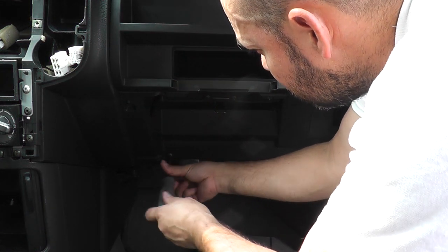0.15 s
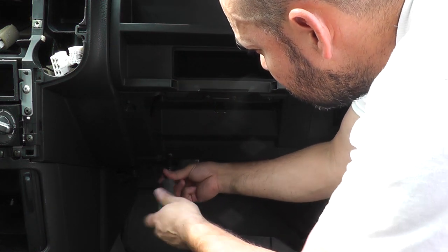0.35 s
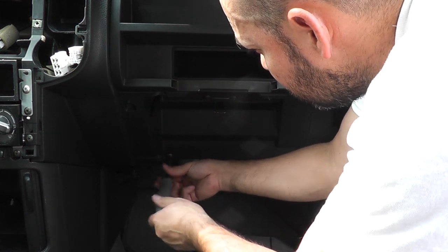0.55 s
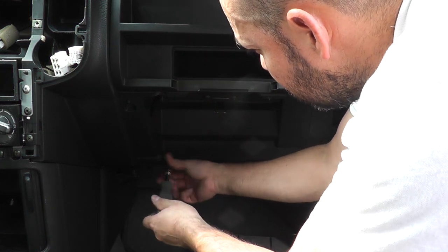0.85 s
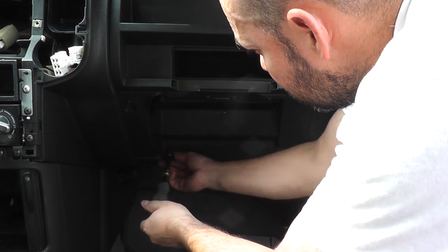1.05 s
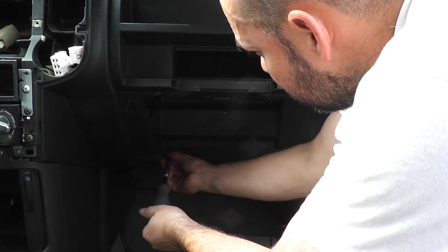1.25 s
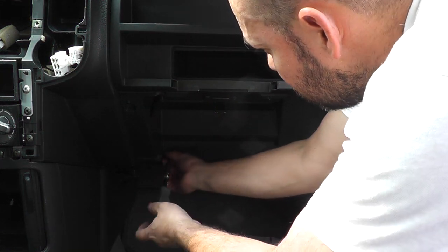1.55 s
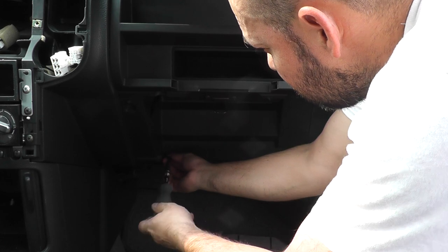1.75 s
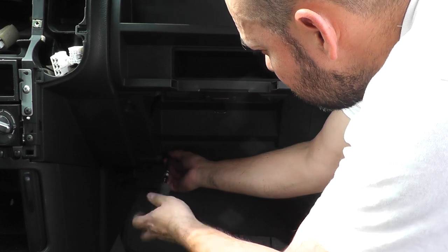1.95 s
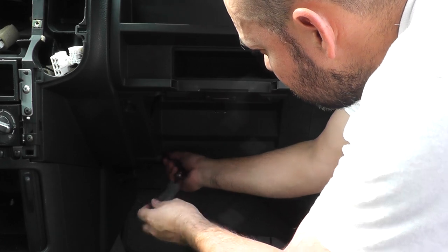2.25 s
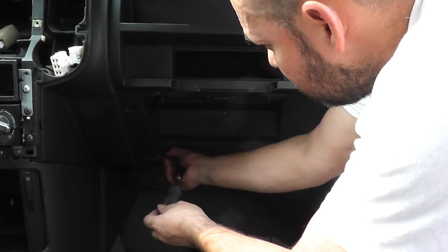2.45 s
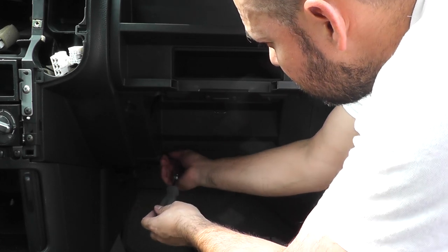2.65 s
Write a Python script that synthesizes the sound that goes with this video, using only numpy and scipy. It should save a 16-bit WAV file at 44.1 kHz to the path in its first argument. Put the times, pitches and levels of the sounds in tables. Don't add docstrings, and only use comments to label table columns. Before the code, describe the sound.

Close up inside a quiet car, a screwdriver tip slips and scrapes in a screw head, knocking hollow plastic; a loud snap comes first, then scattered clicks, a lull, and high chirps as the screw loosens, over faint low hum.

```python
import sys
import numpy as np
from scipy import signal
from scipy.fft import rfft, irfft, next_fast_len
from scipy.io import wavfile
from scipy.ndimage import uniform_filter1d

SR = 44100
rng = np.random.default_rng(int(sys.argv[2]) if len(sys.argv) > 2 else 0)


def dump_mix(stems):
    frames = np.atleast_2d(stems).T
    limited = np.clip(frames, -1, 1)
    pcm = np.round(limited * 32767).astype(np.int16)
    wavfile.write(sys.argv[1], SR, pcm)


def volts(x):
    e = np.asarray(x, float) / 20
    return 10 ** e


N = 123479

# f/Hz, level/dB, t60/s
PANEL_MODES = [(552.2, -1.5, 0.042), (771, -1, 0.029), (1084, -18.5, 0.036), (1320, -15, 0.021),
               (1668, -14.5, 0.023)]
# f/Hz, level/dB, t60/s
HOLLOW_MODES = [(125, -0.5, 0.053), (180.3, -1, 0.1), (219.3, -4.5, 0.082), (280.8, -8, 0.066)]
# f/Hz, level/dB, t60/s
HEAD_MODES = [(2660, 6, 0.014), (3750, 6, 0.029), (5294, 11.5, 0.01), (6360, 3, 0.04), (8770, 11.5, 0.0083),
              (13700, -27, 0.0065)]
# modes, relative spread of close modes around each, crack level/dB
PLASTIC = (PANEL_MODES, 0.07, -42)
HOLLOW = (HOLLOW_MODES, 0.087, -45)
HEAD = (HEAD_MODES, 0.1215, -9)
# f/Hz, level/dB, t60/s
TRIM = ([(1405, 11, 0.023), (1796, 3.5, 0.032), (2580, -5, 0.019)], 0.055, -47)
# f/Hz, coherence
COHERENCE = [(60, 0.96), (250, 0.0), (2200, 0.76), (4600, .995), (6500, 0.94), (9000, 0.65), (15000, 0.45)]


def evened(x):
    return x / np.sqrt(np.mean(x ** 2) + 1e-20)


def read(points, hz):
    f, value = np.transpose(points)
    return np.interp(np.log(hz + 1), np.log(f + 1), value)


def band(x, low_hz, top_hz, order):
    edges_hz = [low_hz, top_hz]
    return signal.sosfilt(signal.butter(order, edges_hz, "band", fs=SR, output="sos"), x)


def ring(modes, crowd, crack_db):
    count, colour_spread_db = 10, 2.5
    hz, db, t60 = np.transpose(np.repeat(modes, count, axis=0))[:, :, None]
    t = np.arange(3000) / SR
    colour, shift = rng.standard_normal((2, len(hz), 1))
    place = np.tile(np.linspace(-1.6, 1.6, count), len(modes))[:, None] + shift / count
    decay = volts(db + colour_spread_db * colour - 60 * t / t60)
    wave = np.sin(2 * np.pi * hz * (1 + crowd * place) * t)
    tap = (decay * np.sign(shift) * wave).sum(0)
    crack = volts(crack_db - 60 * t / .005) * np.diff(rng.standard_normal(3001))
    tap += crack * abs(tap).max()
    return tap / np.linalg.norm(tap)


def strikes(rows, first, second):
    slips_per_s, slip_spread_db, bite_s = 2600, 2, .0012
    out, t = np.zeros(N), np.arange(2000) / SR
    for start_s, peak_db, second_db, length_s in rows:
        slips = (rng.random(len(t)) < slips_per_s / SR) * rng.choice([-1., 1.], len(t))
        slips *= volts(slip_spread_db * np.minimum(rng.exponential(1, len(t)), 2))
        slips *= np.exp(-(t / length_s) ** 2)
        slips[[0, round(bite_s * SR)]] = 1.0
        slips *= np.clip(t / bite_s, .15, 1)
        a = signal.fftconvolve(slips, ring(*first))
        b = signal.fftconvolve(slips, ring(*second))
        sound = volts(peak_db) * (a / abs(a).max() + volts(second_db) * b / abs(b).max())
        part = out[round(start_s * SR):][:len(sound)]
        part += sound[:len(part)]
    return out


def noise(spectrum, patchy_db):
    hz = np.fft.rfftfreq(1024, 1 / SR)
    a, b, c, d, patches = rng.standard_normal((N // 256 + 5, 513, 5)).T
    patches = uniform_filter1d(patches, size=14, axis=0)
    patches = evened(uniform_filter1d(patches, size=8, axis=1))
    like = np.clip(read(COHERENCE, hz), -1, 1)[:, None]
    left = a + 1j * b
    right = like * left + np.sqrt(1 - like ** 2) * (c + 1j * d)
    z = np.array([left, right]) * volts(read(spectrum, hz)[:, None] + patchy_db * patches)
    return evened(signal.istft(z, nperseg=1024, noverlap=768)[1][:, :N])


def air():
    # f/Hz, level/dB per Hz
    hum = [(12, -44), (20, 4.5), (169, -0.5), (392, -7), (859, -10), (1020, -15.5), (2170, -30.5),
           (6300, -32.5), (16400, -36.5)]
    return volts(-53.5) * noise(hum, patchy_db=.8)


def hand():
    # t/s, length/s, creak level/dB, sliding hiss level/dB
    strokes = [(-.01, 0.12, -48, -61.5), (0.122, 0.093, -48.5, -62.5), (0.198, 0.16, -50, -68),
               (0.365, 0.23, -42.5, -65.5), (.47, 0.12, -64, -77), (0.577, 0.13, -47, -70),
               (0.702, 0.25, -45.5, -67), (0.937, 0.22, -64, -86), (1.073, 0.091, -54, -62.5),
               (1.184, 0.16, -51, -71), (1.348, 0.16, -56.5, -75.5), (1.49, 0.26, -63.5, -79.5),
               (1.594, 0.082, -51.5, -67), (1.624, 0.057, -52, -69), (1.735, 0.33, -49, -70.5),
               (2.035, 0.38, -55.5, -74), (2.451, 0.081, -53, -61), (2.54, 0.22, -66, -76.5),
               (2.675, 0.11, -61.5, -69)]
    # f/Hz, level/dB per Hz
    skin = [(590, -47), (1000, -3), (1370, -6.5), (2150, -15), (7980, -16), (16000, -29)]
    grip_s, lift_s = .012, .037
    rubs_per_s, grit_per_s, spread_db = 900, 100, 3.5
    start, length, creak_db, hiss_db = np.transpose(strokes)[:, :, None]
    t = np.arange(N) / SR - start
    lift = np.exp(-np.maximum(t - length + lift_s, 0) / lift_s * 2)
    touch = np.clip(t / grip_s, 0, 1) * lift
    press = (volts(creak_db + 1) * touch).sum(0)
    slide = (volts(hiss_db + 3.5) * touch).sum(0)

    slips = (rng.random(N) < rubs_per_s / SR) * volts(spread_db * np.minimum(rng.exponential(1, N), 3))
    grit = (rng.random(N) < grit_per_s / SR) * volts(spread_db * np.minimum(rng.exponential(1, N), 3))
    creak_drive = evened(slips) * press
    grit_drive = volts(-10) * evened(grit) * slide
    creak = np.zeros(N)
    which = rng.integers(0, 8, N)
    for k in range(8):
        tap = ring(*HOLLOW) + volts(-5.5) * ring(*PLASTIC)
        creak += signal.oaconvolve(creak_drive * (which == k), tap)[:N]
        creak += signal.oaconvolve(grit_drive * (which == k), ring(*HEAD))[:N]
    flicker = evened(uniform_filter1d(rng.standard_normal(N), size=300))
    hiss = noise(skin, patchy_db=-2.0)[0] * slide * volts(3.5 * flicker)
    return creak + hiss


def ticks():
    # t/s, peak level/dB, shaft over head level/dB, scrape length/s
    tight = [(0.0084, -31.5, -15, 0.004), (0.1017, -19, -14.5, 0.0033), (0.137, -41, -10, 0.006),
             (0.1503, -35.5, -5, 0.0089), (0.178, -37.5, -6, 0.0033), (0.383, -44.5, -30, 0.026),
             (0.517, -46, 3.5, 0.008), (0.532, -36.5, -4.5, 0.0058), (0.589, -42, -5, 0.004),
             (0.6481, -34.5, -1.5, 0.011), (0.7255, -37, -13, 0.0028), (0.775, -35, -16, 0.013),
             (0.810, -39, -6, 0.0064), (0.844, -35.5, 1, 0.012), (0.8794, -29, -5, 0.0045),
             (0.926, -46, -15, 0.0017), (1.0805, -38, -42, 0.0043), (1.1995, -40, -15, 0.038),
             (1.219, -32, -11, 0.0026)]
    loosening = [(1.736, -49.5, -8, 0.0055), (1.751, -53, -4, 0.005), (1.769, -50.5, 0, 0.0015),
                 (1.806, -51, -6, 0.0044), (1.845, -44.5, -32, 0.0042), (1.893, -33, -42, 0.0068),
                 (2.1909, -19.5, 0.5, 0.001), (2.2173, -32, -35, 0.0065), (2.265, -30.5, -0.5, 0.0015),
                 (2.2874, -40.5, -10, 0.0028), (2.352, -34.5, -2.5, 0.0038), (2.6005, -41, -10, 0.0026),
                 (2.632, -41.5, -5, 0.0028), (2.772, -41, -7.5, 0.012)]
    # f/Hz, level/dB, t60/s
    shaft = [(8397, 13.5, 0.016), (7960, -15, 0.006), (9090, 1, 0.048)]
    steel = (shaft, 0.0346, -28)
    return strikes(tight, HEAD, steel) + strikes(loosening, HEAD, steel)


def slams():
    # t/s, peak level/dB, snap over dash level/dB, length/s
    blows = [
        (.1015, -15, -24, 0.00027),
        (.1065, -21, -30, 0.00049),
        (2.071, -36, -1, 0.013),
        (2.1915, -40, 3, 0.002),
    ]
    # modes (f/Hz, level/dB, t60/s), relative spread, crack level/dB
    dash = ([(568, -3, 0.077), (706, 3.5, 0.036), (860, -4, .03), (1113, -3, 0.041), (1353, -9, 0.028),
            (1658, -8.5, 0.048), (2680, -6, 0.03), (2970, -24, 0.034), (3370, -19, 0.077),
            (3770, -8, 0.056)], 0.036, -56)
    snap = ([(12000, 3, .012), (13800, -5, .012), (15000, -2, 0.014)], 0.066, -32)
    return strikes(blows, dash, snap)


def clacks():
    # t/s, peak level/dB, head over trim level/dB, length/s
    contacts = [
        (.1018, -30.5, -12, 0.0021),
        (1.2195, -36.5, -13, 0.01),
        (2.193, -29, -3.5, 0.014),
    ]
    return strikes(contacts, TRIM, HEAD)


def knocks():
    # t/s, peak level/dB, hollow over panel level/dB, push length/s
    blows = [(0.103, -27.5, -4, 0.0035), (0.139, -28.5, -4, 0.0096), (0.152, -33, 4, 0.014),
             (0.179, -31.5, 1, 0.0028), (0.382, -34.5, -15, 0.012), (0.65, -30.5, -4, 0.0061),
             (0.728, -28.5, -5.5, 0.0055), (0.772, -32.5, 2.5, 0.028), (0.811, -33.5, -1, 0.018),
             (0.843, -29.5, -5, 0.019), (0.878, -26, -9, 0.0055), (1.081, -34.5, 3, 0.0026),
             (1.23, -35, -2.5, 0.0069), (1.271, -39.5, 7.5, 0.0097), (1.292, -46, 5.5, .01),
             (1.437, -44, -1.5, 0.0033), (1.611, -36, -17, 0.002), (1.635, -36, -10, 0.014),
             (1.893, -28, -0.5, 0.0086), (2.068, -25.5, -9.5, 0.0086), (2.078, -31, -5.5, 0.0064),
             (2.195, -33.5, 4, 0.004), (2.309, -30, -2, 0.0059), (2.32, -34.5, 2, 0.0053),
             (2.462, -33.5, -8.5, 0.0027), (2.476, -37.5, -17, 0.015), (2.697, -46.5, 0.5, 0.0074)]
    return strikes(blows, PLASTIC, HOLLOW)


def picks():
    # t/s, peak level/dB, trim over head level/dB, length/s
    contacts = [(.3118, -47.5, -4, .003), (.4006, -47.5, 4.5, 0.0046), (.6131, -44.5, -5, 0.001),
                (.826, -35.5, -6, 0.0031), (1.240, -46, -7, 0.0034), (1.2926, -49, -2, 0.0021),
                (1.3619, -49.5, -1.5, 0.0018), (1.380, -54, -19, 0.0015), (1.3888, -49, -11, 0.0018),
                (1.4357, -54.5, 3, 0.0019), (1.635, -48.5, 4, 0.0028), (1.812, -51, 0, 0.004),
                (2.066, -28.5, -2.5, 0.0087), (2.093, -37, -13, 0.0043), (2.106, -46, -28, 0.0027),
                (2.123, -33.5, -23, .005), (2.3088, -43.5, 4.5, 0.0032), (2.4615, -34, -24, 0.0023),
                (2.490, -41, -23, .004), (2.5615, -50, 0, 0.0025), (2.621, -57, 7, 0.0023),
                (2.6929, -49.5, -6, 0.0073), (2.797, -38, -13, 0.004)]
    return strikes(contacts, HEAD, TRIM)


def chirps():
    # t/s, peak level/dB, screw over head level/dB, scrape length/s
    turns = [(2.0715, -23, 1.5, 0.0054), (2.078, -28.5, 9, 0.003), (2.1015, -35, 5, 0.0058),
             (2.114, -38, -1, 0.0062), (2.129, -39, 9, 0.0055), (2.1545, -38.5, 5.5, 0.012),
             (2.162, -40.5, 4, 0.015), (2.1775, -40, -2, 0.0044), (2.1915, -25.5, 6, 0.0022),
             (2.450, -36.5, 0, 0.0015), (2.4625, -42, 9, 0.005), (2.482, -46, 10.5, 0.0033),
             (2.490, -44, 6, 0.0051), (2.528, -35, 15, 0.0051), (2.561, -30.5, -0.5, 0.0017),
             (2.579, -40, 11.5, 0.0031)]
    # f/Hz, level/dB, t60/s
    screw = [(7540, 1, 0.014), (8430, 9, 0.01), (9520, 19.5, 0.014), (9720, 20.5, 0.011),
             (10000, -18, .012)]
    return strikes(turns, HEAD, (screw, 0.013, -17.5))


def cabin(x):
    # f/Hz, t60/s
    damping = [(200, 0.099), (1000, 0.096), (4000, 0.022), (12000, 0.046)]
    taps = np.zeros((2, 9000))
    at = np.arange(120, 8980, 20) + rng.integers(0, 20, (2, 443))
    np.put_along_axis(taps, at, rng.choice([-1., 1.], at.shape), 1)
    hz, t, z = signal.stft(taps, SR, nperseg=128)
    decay = volts(-60 * t / read(damping, hz)[:, None])
    tail = signal.istft(z * decay, SR, nperseg=128)[1]
    tail /= np.linalg.norm(tail[0])
    return volts(-14) * signal.fftconvolve(x[None], tail, axes=1)[:, :N]


def ports(x):
    # f/Hz, left over right level/dB
    lean = [(60, -0.27), (240, 0), (950, 3.5), (3770, -0.8), (15000, 4)]
    # f/Hz, left lead/rad
    lead = [(0, 0), (340, 0.23), (1720, -0.17), (7410, 0.019), (11600, -0.1), (16100, 0.1)]
    size = next_fast_len(N + 4096)
    hz = np.fft.rfftfreq(size, 1 / SR)
    half = volts(read(lean, hz) / 2) * np.exp(.5j * read(lead, hz))
    return irfft(rfft(x, size) * np.array([half, 1 / half]), size)[:, :N]


def scene():
    work = hand() + ticks() + clacks() + knocks() + picks() + chirps()
    work = band(work, 116.7, 9830, order=3) + slams()
    return air() + ports(work) + cabin(work)


def low_pass(x):
    return signal.sosfilt(signal.butter(12, 15900, fs=SR, output="sos"), x)


def record(dry):
    mix = band(dry, 41, 15200, order=4)
    return low_pass(mix)


dry = scene()
out = record(dry)
dump_mix(out)
```